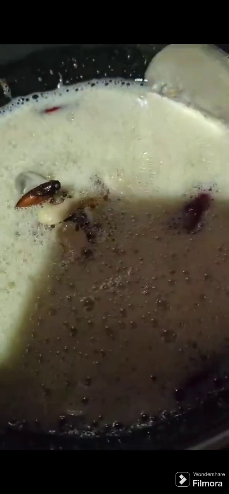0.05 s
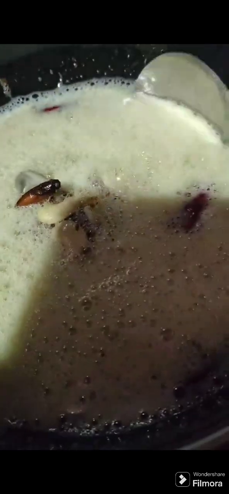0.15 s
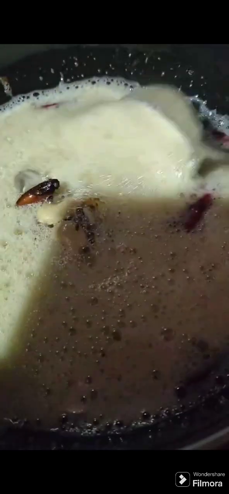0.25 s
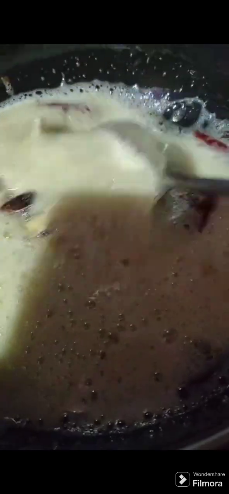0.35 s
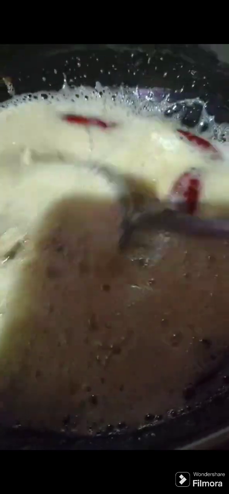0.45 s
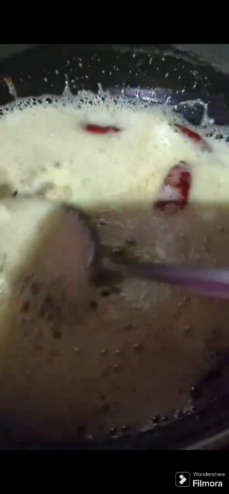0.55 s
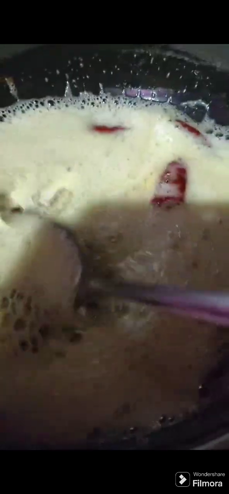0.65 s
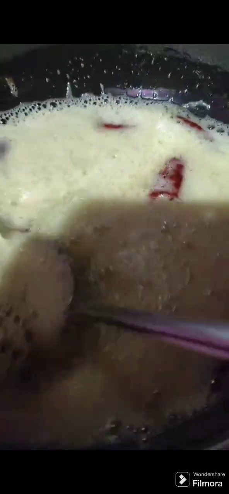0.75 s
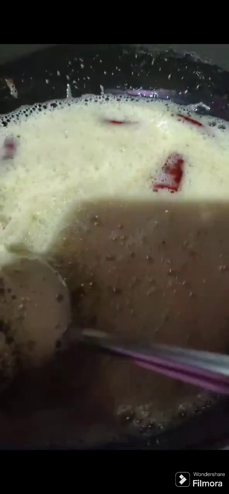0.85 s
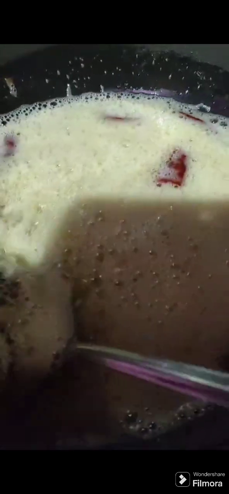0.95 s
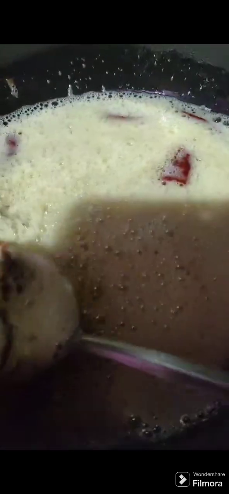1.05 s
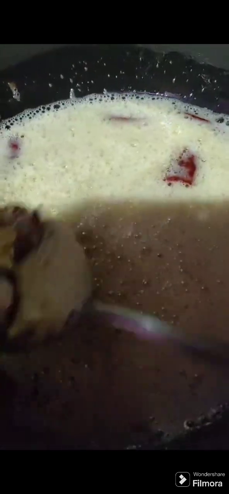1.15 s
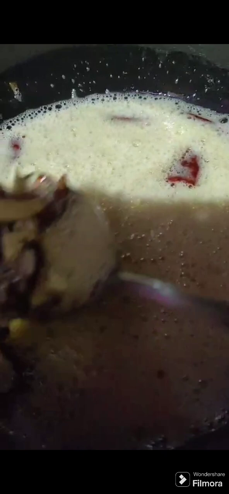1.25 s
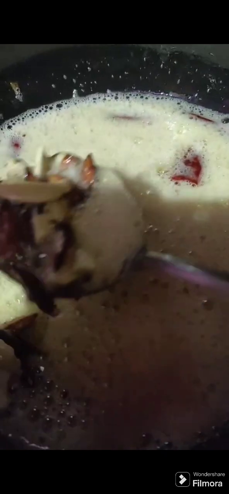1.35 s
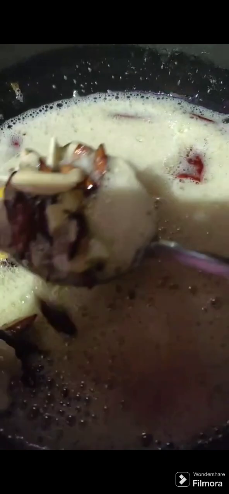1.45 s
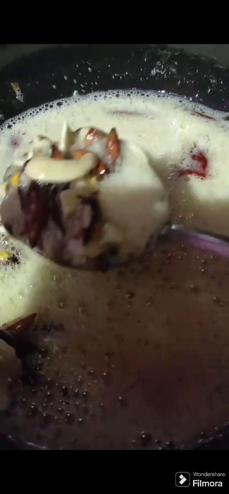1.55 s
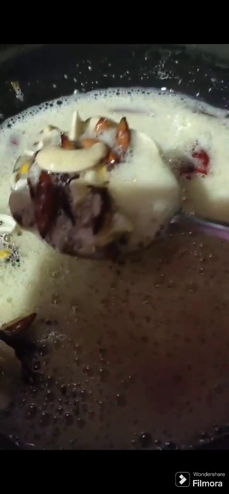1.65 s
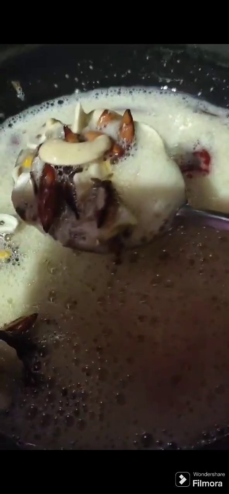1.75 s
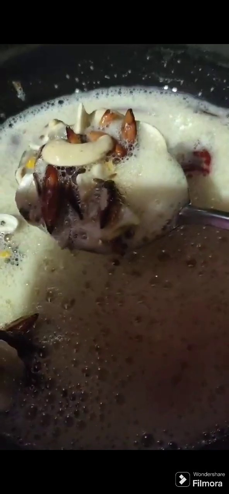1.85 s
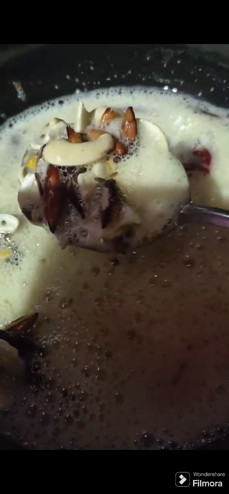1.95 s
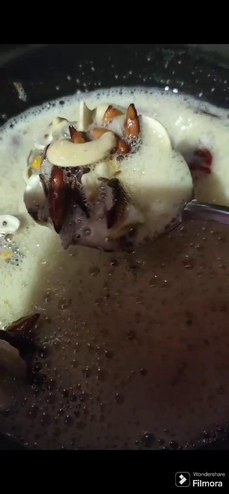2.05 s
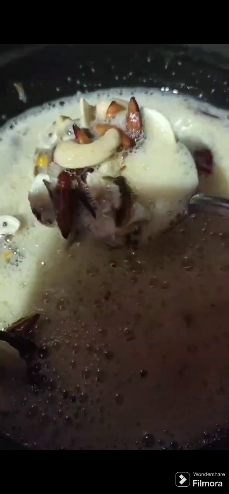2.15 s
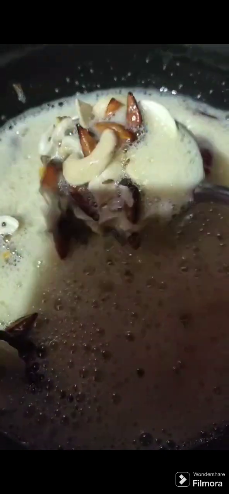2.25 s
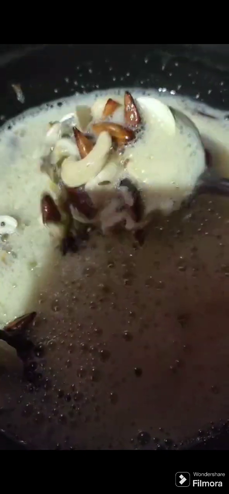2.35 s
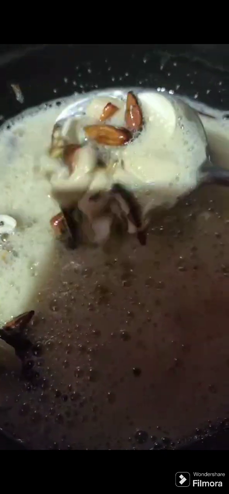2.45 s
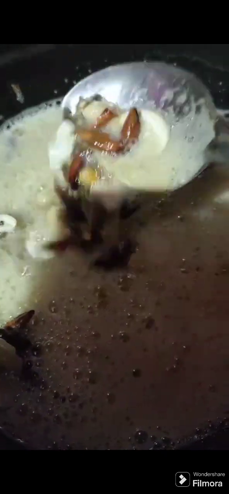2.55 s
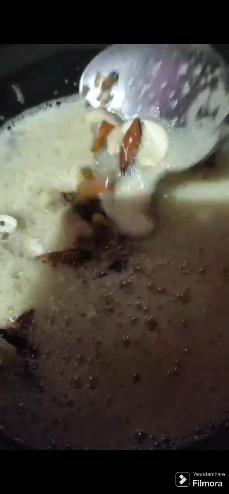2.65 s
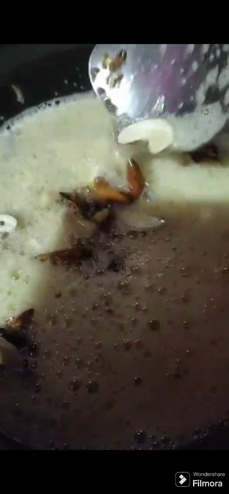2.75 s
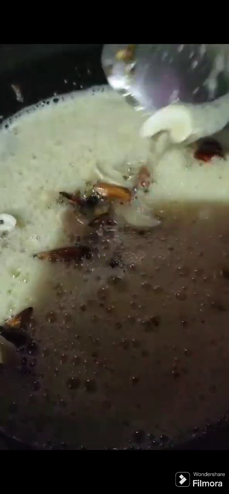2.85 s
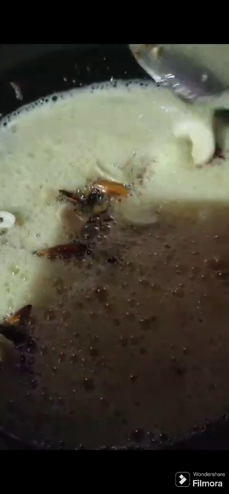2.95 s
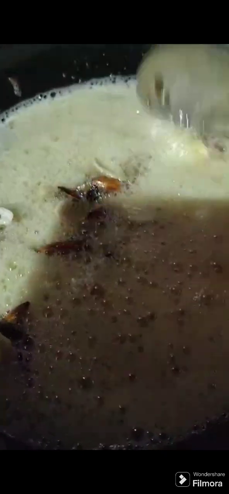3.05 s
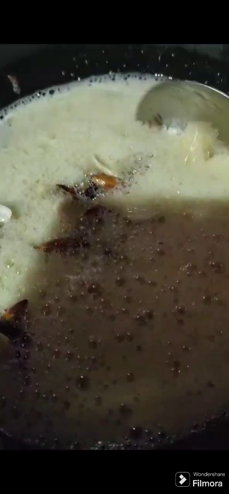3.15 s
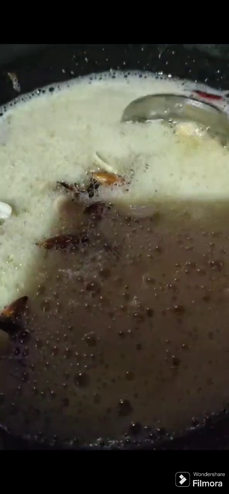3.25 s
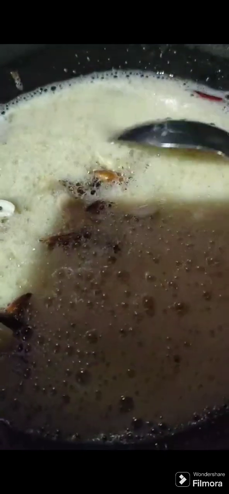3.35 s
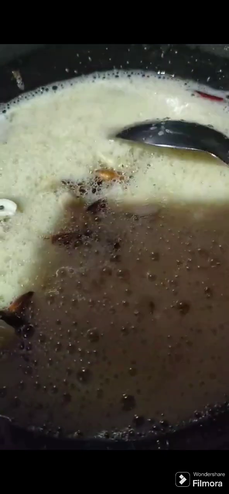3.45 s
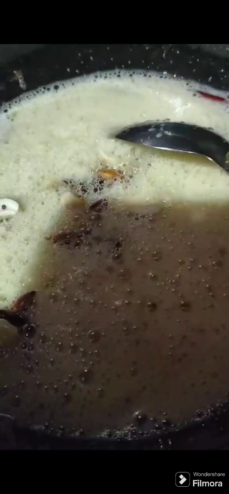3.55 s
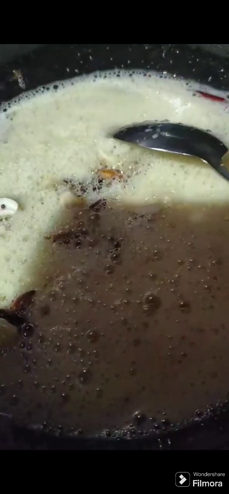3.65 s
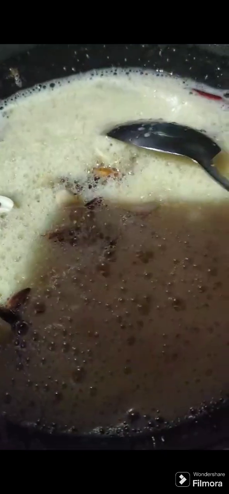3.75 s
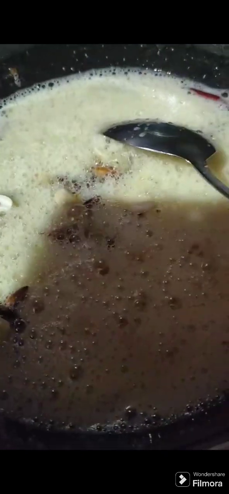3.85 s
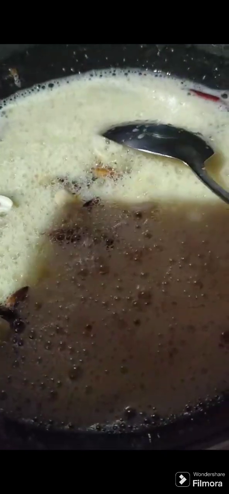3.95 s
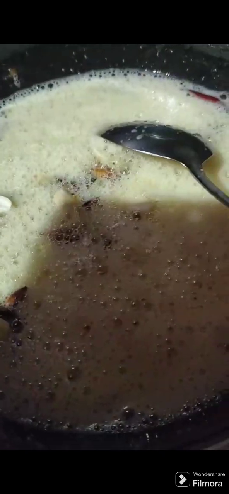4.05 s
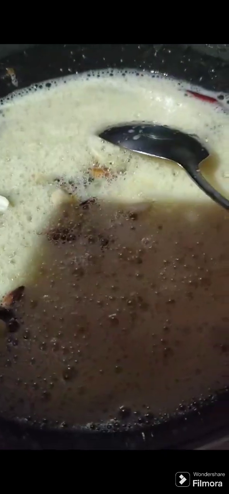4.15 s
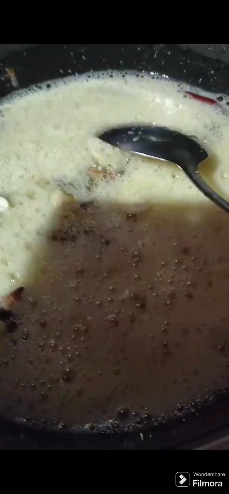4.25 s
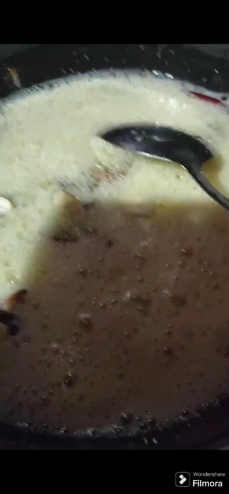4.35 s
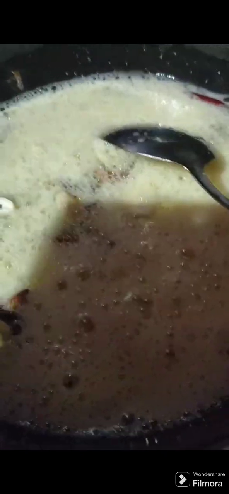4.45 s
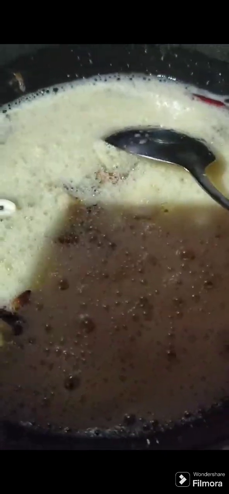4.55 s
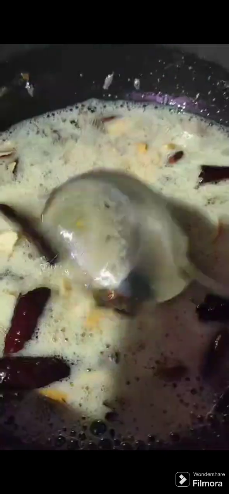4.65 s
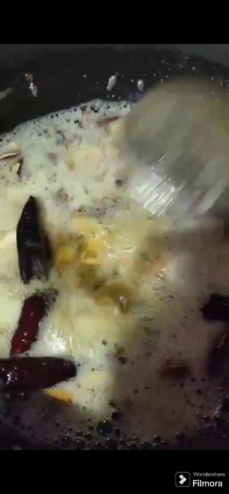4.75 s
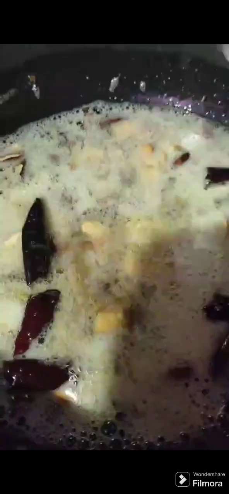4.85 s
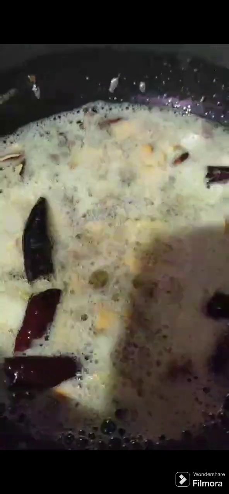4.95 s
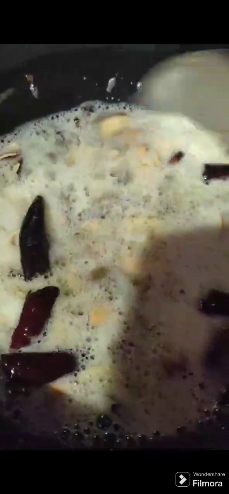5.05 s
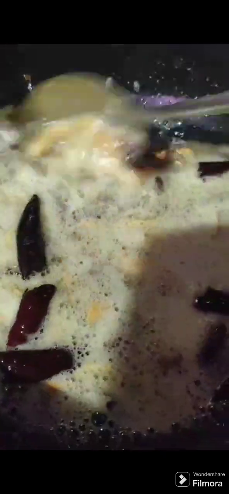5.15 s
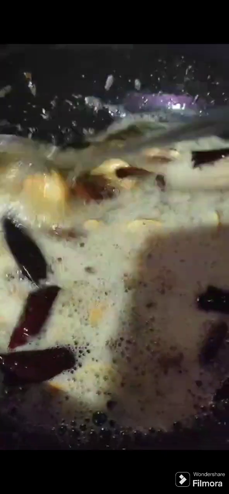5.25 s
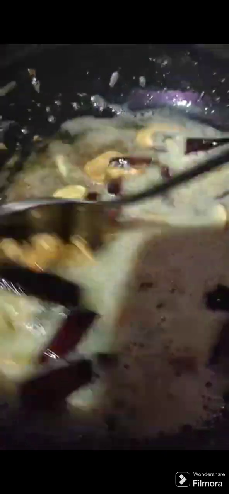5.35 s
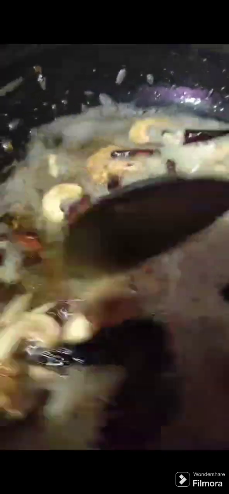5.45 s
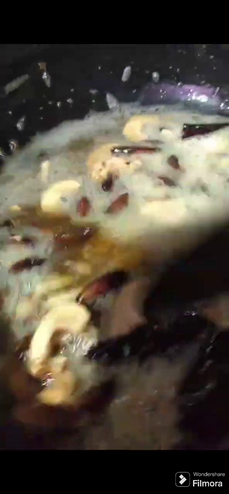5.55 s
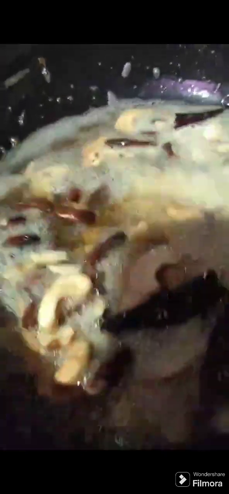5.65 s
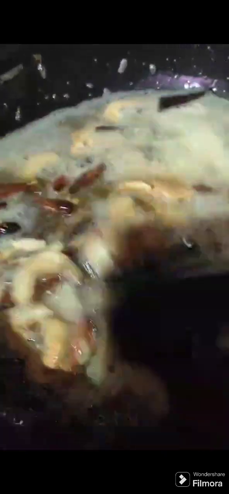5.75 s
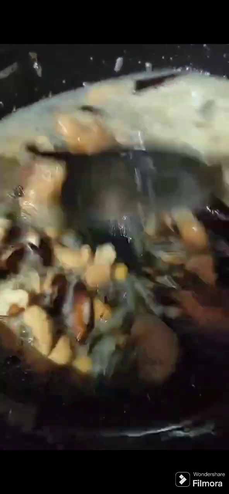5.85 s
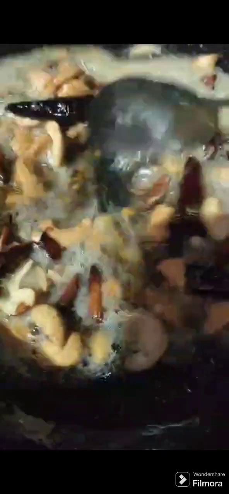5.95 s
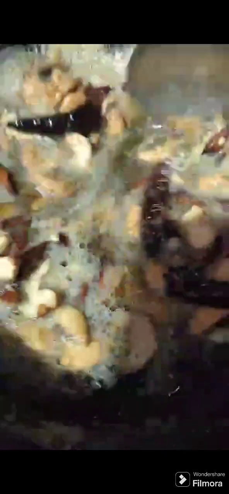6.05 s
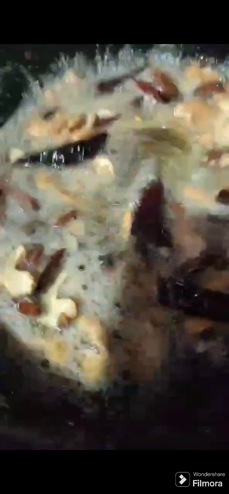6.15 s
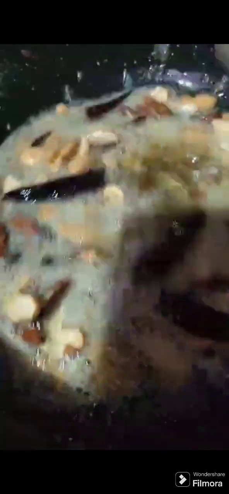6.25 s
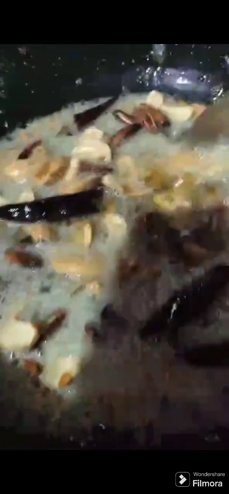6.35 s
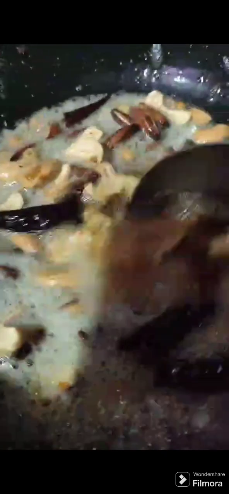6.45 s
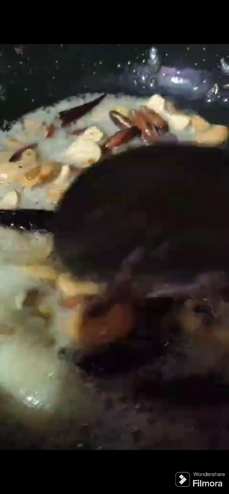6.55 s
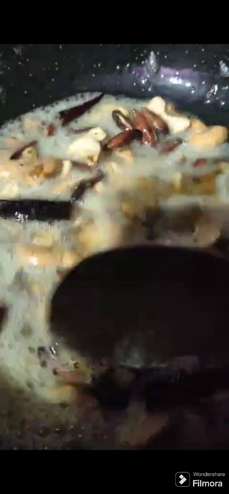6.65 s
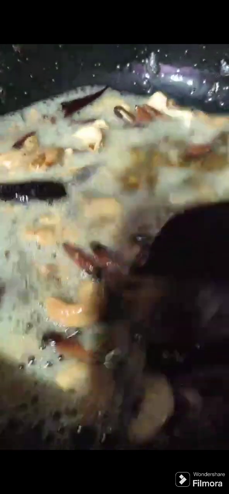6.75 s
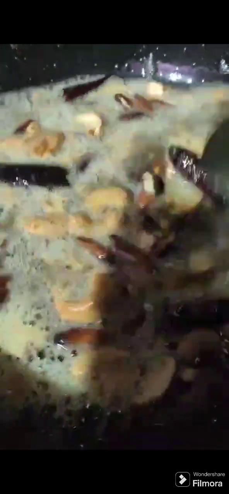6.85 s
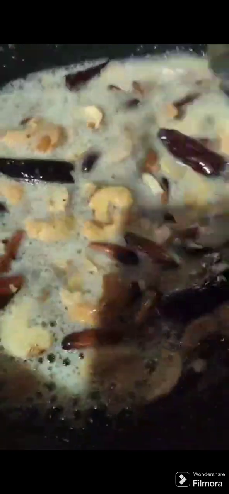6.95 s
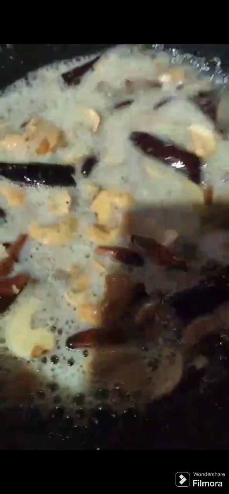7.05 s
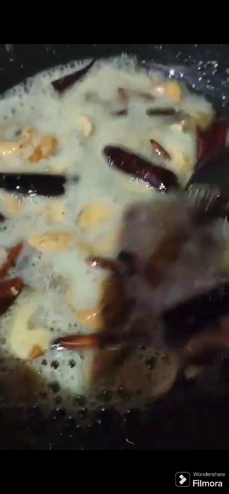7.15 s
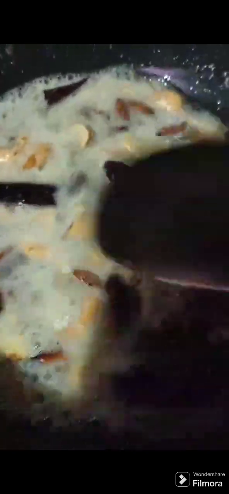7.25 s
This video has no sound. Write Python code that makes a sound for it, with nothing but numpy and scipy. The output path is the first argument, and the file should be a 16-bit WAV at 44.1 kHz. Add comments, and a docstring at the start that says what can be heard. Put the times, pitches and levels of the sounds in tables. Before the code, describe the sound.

A small kitchen heard close to a pan, in stereo, over low room noise and faint wavering traffic drones. At 0.15-0.6 s a steel spoon taps and scrapes roughly with short thin squeals, and the oil flares into bright fizz around 0.4 s. Dull knocks follow at 1.05 and 1.2 s; fizz rises and falls, nearly calming around 2 s, then swelling again near 2.7 s with spits and watery plops. A light clink at 3.4 s and tiny muffled rattles at 3.6-3.7 s lead into quieter bubbling with very faint high tones. At 4.67 s everything cuts out for a few hundredths of a second. Livelier frying then builds, with a distant engine throbbing low. The spoon squeals and scrapes at 5.1-5.45 s, clanks hard and brightly at 5.75-5.95 s, then knocks again at 6.3-6.5, 6.8 and 7.1 s amid sharp sizzling bursts until about 7.3 s.

```python
"""A small kitchen, heard close to the pan: nuts and dried chillies fry in foaming oil.
The oil is dense filtered pops for bubbling, fizz and spatter, with single spits and plops; faint tones join in.
A steel spoon scrapes (rough noise and gliding squeals), clinks (struck resonances) and rattles in the pan.
Outside, wavering sines drone as traffic over low room noise. The sound cuts out briefly at 4.665 s; then
livelier frying builds up and a distant engine idles, as filtered firing pulses and noise."""
import sys
import numpy as np
from scipy import signal
from scipy.fft import rfft, irfft
from scipy.io import wavfile
from scipy.ndimage import uniform_filter1d, map_coordinates

SR = 44100
rng = np.random.default_rng(int(sys.argv[2]) if len(sys.argv) > 2 else 0)


def file_out(sig):
    """Save sig as 16-bit WAV at sys.argv[1]."""
    # one column per channel
    cols = np.atleast_2d(sig).T
    # limit, then scale
    lim = np.clip(cols, -1, 1)
    pcm = np.round(lim * 32767).astype(np.int16)
    wavfile.write(sys.argv[1], SR, pcm)


N = 322638
TIME = np.arange(N) / SR
BREAK_START_S, BREAK_END_S = 4.665, 4.702  # the silence
LEFT_LAG = 12  # samples by which clicks reach the left port late


# The oil flares when it is stirred or the nuts drop back, then settles.
# Columns: peak t/s, rise time/s, fizz level/dB, fall/dB per s
OIL_SURGES = [(0.38, 0.39, -51.5, 27), (0.85, 0.4, -62, 35), (1.25, 0.6, -58, 45), (1.6, 0.88, -63.5, 65),
              (2.05, 0.24, -73.5, 7), (2.42, 0.17, -63, 31), (2.68, 0.47, -55.5, 46),
              (3.25, 0.44, -65.5, 49), (3.6, 0.69, -66.5, 26), (4.08, 0.63, -77.5, 46.5),
              (5.3, 0.28, -45, 72), (5.799, 0.083, -47, 30), (6.45, 0.091, -45, 87), (6.86, 0.29, -54, 99),
              (7.14, 0.032, -62, 6)]
SURGE_RISE_DB, CALM_DB = 28, -91  # depth of each rise; fizz of undisturbed oil
SIMMER_DB = -60  # fizz level at which the oil counts as simmering


def sizzle_db():
    """How hard the oil fizzes, in dB: every surge rises, then settles towards calm."""
    power = amp(CALM_DB) ** 2
    for s, rise_s, db, fall in OIL_SURGES:
        since_peak = TIME - s
        shape_db = np.minimum(SURGE_RISE_DB * since_peak / rise_s, -fall * since_peak)
        power = power + amp(db + np.minimum(shape_db, 0)) ** 2
    return 10 * np.log10(power)


# Tone of the large bubbles, also used for the snap of a plop. Columns: f/Hz, level/dB
BUBBLING_SPECTRUM = [(200, -30), (450, -3.5), (750, -2.5), (1150, -4.5), (1550, -3), (2100, -2),
                     (3000, -3.5), (3900, -13), (5000, -5.5), (8000, -76)]
# Tone of the small bubbles. Columns: f/Hz, level/dB
FIZZ_SPECTRUM = [(2500, -57), (4100, -22), (5000, -3.5), (6100, 3.5), (6800, -2.5), (7500, 4), (8300, -8.5),
                 (9200, -9), (10300, -21.5), (12000, -56), (16000, -48)]
# Tone of the finest bubbles. Columns: f/Hz, level/dB
SPATTER_SPECTRUM = [(1500, -35), (4000, 2.5), (7000, -4.5), (10500, -8.5), (13000, -2.5), (15500, -5)]
# Level at a simmer, dB gained per dB of fizz, and the ceiling of the bubbling
BUBBLING_DB, BUBBLING_FOLLOWS, BUBBLING_MOST_DB = -58, 0.74, -56.5
SPATTER_DB, SPATTER_FOLLOWS = -68, 0.94  # the same two for the spatter
# Steady frying that builds up from the start of the silence
LIVELY_FIZZ_DB, LIVELY_BUBBLING_DB, LIVELY_RISE_S = -56.5, -62, 0.53


def frying():
    """Steam bubbles burst in the foam: large ones blip, small ones fizz, the finest spit."""
    t = TIME[:512]
    blips = 0
    for hz in np.geomspace(600, 2700, num=7):
        blip = np.sin(2 * np.pi * hz * t) * np.exp(-t * hz / 1.5) * hz ** .8
        blips = blips + signal.oaconvolve(pops(per_s=90, spread_db=3.4), blip[None], axes=1)[:, :N]
    large = unit(blips) + pops(per_s=2500, spread_db=2)
    small = pops(per_s=3000, spread_db=3.8)
    finest = pops(per_s=1300, spread_db=3.8)

    fizz_db = sizzle_db()
    over_simmer_db = fizz_db - SIMMER_DB
    lively = np.clip((TIME - BREAK_START_S) / LIVELY_RISE_S, 0, 1)
    bubbling_db = np.minimum(BUBBLING_DB + BUBBLING_FOLLOWS * over_simmer_db, BUBBLING_MOST_DB)
    bubbling_gain = np.hypot(amp(bubbling_db), lively ** 2 * amp(LIVELY_BUBBLING_DB))
    fizz_gain = np.hypot(amp(fizz_db), lively * amp(LIVELY_FIZZ_DB))
    spatter_gain = amp(SPATTER_DB + SPATTER_FOLLOWS * over_simmer_db)

    # bursts, spectrum, gain, how far the ports differ
    layers = [(large, BUBBLING_SPECTRUM, bubbling_gain, 1),
              (small, FIZZ_SPECTRUM, fizz_gain, 1.5),
              (finest, SPATTER_SPECTRUM, spatter_gain, 1.6)]
    out = 0
    for bursts, spectrum, gain, lean in layers:
        smeared = scatter(bursts, db=-4, t60=.06)
        in_room = kitchen(smeared, near_db=-11, far_db=-5, near_t60=.03)
        out = out + unit(ports(colour(in_room, spectrum), lean)) * gain
    return flicker(out, depth_db=2.6, per_s=14, count=56)


# Drops of water that spit in the fat. Columns: t/s, peak level/dB before colouring, f/Hz
WATER_SPITS = [(0.277, -27, 7800), (0.308, -25, 7000), (0.61, -34, 5500), (1.276, -40, 7000),
               (1.576, -36, 6000), (2.481, -32, 8200), (2.72, -34, 7500), (2.743, -39, 10000),
               (4.884, -58, 3300), (5.004, -35.5, 5040), (5.228, -31, 3600), (5.556, -42, 7500),
               (6.132, -33.5, 2600), (6.652, -48, 3000)]
# Tone shared by all spits. Columns: f/Hz, level/dB
SPIT_SPECTRUM = [(1000, -30), (2500, -6.5), (9000, -3.5), (15000, -13)]
SPIT_Q = 2  # sharpness of a spit's resonance
# Lesser spits: rate, range of levels above the fizz, ceiling (before colouring), range of pitches
CRACKLES_PER_S, CRACKLE_OVER_FIZZ_DB, CRACKLE_MOST_DB, CRACKLE_HZ = 40, (2, 14), -43, (5500, 9500)


def spits():
    """Drops of water snap in the hot fat: a few stand out, many small ones crackle with the fizz."""
    out = np.zeros((2, N))
    when, strength, pitch = rng.random((int(CRACKLES_PER_S * N / SR), 3)).T
    over_fizz_db = np.interp(strength ** 3, [0, 1], CRACKLE_OVER_FIZZ_DB)
    level_db = np.minimum(sizzle_db()[(when * N).astype(int)] + over_fizz_db, CRACKLE_MOST_DB)
    crackles = zip(when * N / SR, level_db, np.interp(pitch, [0, 1], CRACKLE_HZ))
    for s, db, hz in [*WATER_SPITS, *crackles]:
        snap = contact(chatter_db=-4, chatter_t60=0.01)[:, :512]
        tick = signal.lfilter(*signal.iirpeak(hz, SPIT_Q, fs=SR), snap)
        add(out, s, amp(db) * tick / abs(tick).max())
    return ports(colour(scatter(out, db=-8, t60=.05), SPIT_SPECTRUM), lean=0.58)


# Large bubbles burst and nuts drop back into the oil.
# Columns: t/s, peak level/dB before the room, f/Hz
LARGE_PLOPS = [(0.571, -38, 1210), (1.368, -41.5, 700), (2.492, -53, 900), (2.613, -40, 865),
               (2.668, -60, 850), (3.102, -46, 880), (3.225, -39.5, 650), (3.276, -47, 900),
               (3.862, -48, 1250), (4.034, -65, 1120), (4.136, -59, 1100), (4.757, -44.5, 790),
               (5.004, -41, 1130), (5.064, -32.5, 550), (6.123, -38, 1250), (6.194, -40.5, 1010),
               (6.22, -40, 1500), (6.646, -36, 1240), (6.681, -39, 1350), (6.731, -40.5, 1197)]
# Lesser bubbles: rate, range of levels at a simmer or hotter, range of pitches
SMALL_PLOPS_PER_S, SMALL_PLOP_DB, SMALL_PLOP_HZ = 8.4, (-54, -55), (684, 1500)


def plops():
    """A film of oil snaps and the cavity under it rings for a few cycles."""
    out = np.zeros((2, N))
    when, strength, pitch = rng.random((int(SMALL_PLOPS_PER_S * N / SR), 3)).T
    over_simmer_db = sizzle_db()[(when * N).astype(int)] - SIMMER_DB
    heat_db = np.minimum(BUBBLING_FOLLOWS * over_simmer_db, 0)
    level_db = heat_db + np.interp(strength, [0, 1], SMALL_PLOP_DB)
    lesser = zip(when * N / SR, level_db, np.interp(pitch, [0, 1], SMALL_PLOP_HZ))
    for s, db, hz in [*LARGE_PLOPS, *lesser]:
        snap = colour(contact(chatter_db=1, chatter_t60=0.013), BUBBLING_SPECTRUM)
        plop = signal.lfilter(*signal.iirpeak(hz, 3, fs=SR), snap) + .05 * snap
        add(out, s, amp(db) * plop / abs(plop).max())
    return ports(kitchen(out, near_db=-10, far_db=-10, near_t60=.04), lean=.9)


# Blows of spoon on pan, each sounded 1.5 ms after its t. Columns: t/s, base level/dB, base f/Hz,
# wall level/dB, wall f/Hz, rim level/dB, rim f/Hz, clink level/dB, bowl f/Hz,
# left minus right/dB before port colour, after-ring level/dB
SPOON_HITS = [(.158,-52.5,540,-53.5,1360,-51.5,2700,-48.5,8300,3.5,-0.5),
              (.167,-55.5,605,-56,1280,-53.5,2510,-54.5,8360,9,0.5),
              (.208,-59.5,597,-54.5,1200,-57,2360,-61,8400,5,0),
              (0.367,-66,824,-71,1400,-61.5,2800,-58,7460,2,4),
              (.438,-65.5,610,-60,1490,-67,2620,-56.5,6470,8,1.5),
              (1.057,-54.5,880,-57,1750,-72,2830,-57.5,5700,5.5,-2.5),
              (1.219,-51,540,-52,1095,-68,2780,-59,6800,4.5,0),
              (3.39,-49,747,-54,1990,-57,2780,-51.5,8100,4,2),
              (5.073,-49.5,740,-54,1570,-72,2600,-60.5,8550,4,-4),
              (5.12,-55,587,-59,1360,-61.5,2600,-52.5,8300,-5.5,2.5),
              (5.374,-55.5,806,-55,1350,-72,2900,-59,5960,2,0),
              (5.397,-56,690,-65,1126,-71,2800,-57,8240,9,-4),
              (5.7448,-39.5,930,-33.5,1640,-39,2850,-26.5,6700,3.5,-2.5),
              (5.779,-53,785,-45,1270,-48,2770,-47,7660,3,-6),
              (5.832,-41.5,700,-34.5,1296,-42.5,2440,-48,6500,2.5,-10.5),
              (5.927,-52,647,-54.5,1370,-60.5,2600,-53.5,6100,1,0.5),
              (6.3245,-40.5,620,-41.5,1160,-43.5,2990,-35,6560,3,-2.5),
              (6.437,-36.5,653,-34.5,1183,-39.5,2530,-39,6960,0.5,-4),
              (6.486,-51.5,540,-52.5,1170,-64,2500,-58,6860,6,-4),
              (6.825,-51,750,-45.5,1730,-63,2130,-56,7140,1,-5),
              (7.1208,-44.5,760,-43.5,1545,-50,2830,-38.5,7060,-0.5,0.5)]
# Dull thud of the pan's base. Columns: f/Hz, level/dB
KNOCK_SPECTRUM = [(40, -43), (170, -3), (350, -5), (600, 1.5), (900, 4), (1300, -4), (2500, -57)]
# Body of the pan's wall. Columns: f/Hz, level/dB
BODY_SPECTRUM = [(500, -16.5), (1000, 13), (1400, 2), (2200, 0), (3000, -8), (3900, -33.5), (5000, -14),
                 (8000, -64)]
# Bright steel of the spoon, also the hiss of a scrape. Columns: f/Hz, level/dB
CLINK_SPECTRUM = [(2000,-55), (4000,-13), (5200,-3.5), (6400,1.5), (8300,-4.5), (10000,-10), (11500,-11),
                  (13000,-15), (15500,-13.5)]
# Half width of each part's resonance, as a share of its pitch
BASE_SPREAD, WALL_SPREAD, RIM_SPREAD = 0.26, 0.17, 0.085
# The pure tone each struck part leaves behind; the bowl's is weaker by a further BOWL_LINGER_DB
LINGER_DB, BOWL_LINGER_DB, LINGER_T60_S = -10.5, -4.5, 0.2
TAIL_UNEVEN_DB = 2.8  # how unevenly the ring of a blow dies away


def clinks():
    """Each blow sounds base, wall and rim at pitches set by where it lands, and the spoon's bowl clinks."""
    direct, tail = np.zeros((2, 2, N))
    t = TIME[:SR // 4]
    for (s, base_db, base_hz, wall_db, wall_hz, rim_db, rim_hz,
         clink_db, bowl_hz, pan_db, after_db) in SPOON_HITS:
        start = s + .0015
        push = contact(chatter_db=-3.0, chatter_t60=0.018)
        base = unit(band(push, base_hz, BASE_SPREAD) + 1.13 * unit(colour(push, KNOCK_SPECTRUM)))
        wall = unit(band(push, wall_hz, WALL_SPREAD) + .5 * unit(colour(push, BODY_SPECTRUM)))
        rim = band(push, rim_hz, RIM_SPREAD)
        bright = colour(contact(chatter_db=4.0, chatter_t60=0.017), CLINK_SPECTRUM)
        bowl = unit(bright + 1.6 * signal.lfilter(*signal.iirpeak(bowl_hz, 12, fs=SR), bright))
        pan_parts = amp(base_db) * base + amp(wall_db) * wall + amp(rim_db) * rim
        side = amp([[pan_db / 2], [-pan_db / 2]])
        blow = side * (pan_parts + amp(clink_db) * bowl)

        parts = [(base_db, base_hz), (wall_db, wall_hz), (rim_db, rim_hz),
                 (clink_db + BOWL_LINGER_DB, bowl_hz)]
        tones = sum(amp(db) * np.sin(2 * np.pi * hz * t) for db, hz in parts)
        lingering = side * tones * amp(LINGER_DB + after_db - 60 * t / LINGER_T60_S)

        struck = np.pad(blow * amp(after_db), [(0, 0), (0, len(t) - blow.shape[1])])
        rung = ring(struck, ring_db=-16.5)
        # the blow itself is taken out, leaving ring and echoes
        echoes = kitchen(rung, near_db=-1.0, far_db=-7.5, near_t60=0.12) - struck
        add(direct, start, blow)
        add(direct, start, lingering)
        add(tail, start, echoes)
    # nuts and oil shift against the metal, so it dies away unevenly
    return ports(direct + flicker(tail, TAIL_UNEVEN_DB, per_s=22, count=72), lean=0.93)


# Spoon dragged over the pan, one curve a stroke, before ring and room. Columns: t/s, grinding level/dB,
# contact resonance level/dB, contact f/Hz, rim level/dB, hiss level/dB
SCRAPE_STROKES = [
    [(.18,-55,-60,1250,-63,-66), (.215,-49,-56,1200,-58,-59), (.26,-61.5,-56,1170,-69,-76),
     (.31,-53,-48,1080,-52,-50.5), (.37,-49.5,-59,1240,-50.5,-54), (.44,-52.5,-48.5,1280,-55,-60),
     (.55,-53.5,-57,1000,-65,-67), (.66,-64,-81,1000,-82,-63)],
    [(5.12,-56,-60,1430,-48,-41), (5.155,-67,-56,1370,-47.5,-42), (5.19,-49,-43.5,1100,-47,-42.5),
     (5.25,-47,-46.5,1050,-55,-43), (5.29,-54,-50.5,1070,-58,-46.5), (5.33,-47,-44.5,1040,-65,-48.5),
     (5.385,-50,-54,990,-53,-50), (5.415,-59,-76,950,-60,-56), (5.47,-60,-73,954,-61,-56)],
    [(5.8,-51,-59,1200,-52,-52), (5.87,-43.5,-46,1000,-59,-48), (5.91,-61,-56,850,-62,-69),
     (5.95,-49,-58,790,-49.5,-42.5), (6.09,-62,-73,791,-75,-66)],
    [(6.412,-64,-63,1150,-66,-63), (6.427,-55,-49,1200,-48,-44), (6.44,-59,-54,1250,-45,-46)],
    [(6.83,-63,-59,1300,-61,-55), (6.855,-46.5,-49,1230,-49.5,-45), (6.91,-70,-74,1150,-65,-64)],
]
# Rough tone of the grinding. Columns: f/Hz, level/dB
GRIND_SPECTRUM = [(150, -18.5), (400, -2), (580, 6.5), (750, 4.5), (1130, 2.5), (1500, -7), (2000, 4),
                  (2900, -14), (3900, -8.5), (6000, -63)]
# Squeals of the spoon's edge, most of them sinking as it slows.
# Columns: t/s, length/s, first f/Hz, last f/Hz, level/dB (sine peak, before ring and room)
EDGE_SQUEALS = [(0.151, 0.084, 2650, 2580, -49), (0.29, 0.057, 1182, 1090, -49.5),
                (0.293, 0.045, 2700, 2840, -53), (0.415, 0.053, 1494, 1427, -53),
                (0.52, 0.055, 1200, 1090, -57), (5.132, 0.041, 2646, 2572, -40.5),
                (5.136, 0.039, 1465, 1320, -48.5), (5.139, 0.035, 3870, 3800, -50),
                (5.232, 0.031, 1030, 970, -42.5)]
SQUEAL_WAVER = 0.025  # rms share of the pitch
# The edge slips in tiny jerks: their rate and spread of strength
SLIPS_PER_S, SLIP_SPREAD_DB = 1000, 3.0
SCRAPE_RIM_HZ, RIM_WIDTH_HZ, CONTACT_WIDTH_HZ = 2500, 810, 500


def scraping():
    """The spoon's edge sticks and slips over the pan, and now and then locks into a squeal."""
    out = np.zeros((2, N))
    for stroke in SCRAPE_STROKES:
        at, *columns = np.transpose(stroke)
        t = np.arange(at[0], at[-1], 1 / SR)
        grind_db, contact_db, contact_hz, rim_db, hiss_db = (np.interp(t, at, column) for column in columns)
        slips = unit(scatter(pops(SLIPS_PER_S, SLIP_SPREAD_DB, len(t)), db=-7, t60=.04))
        # the moving contact favours now one resonance, now another
        uneven = flicker(slips, depth_db=4.4, per_s=34, count=56)
        grinding = amp(grind_db) * unit(colour(uneven, GRIND_SPECTRUM))
        hiss = amp(hiss_db) * unit(colour(uneven, CLINK_SPECTRUM))
        contact_tone = amp(contact_db) * sing(slips, contact_hz, CONTACT_WIDTH_HZ)
        rim_tone = amp(rim_db) * sing(uneven, SCRAPE_RIM_HZ, RIM_WIDTH_HZ)
        add(out, at[0], grinding + hiss + contact_tone + rim_tone)
    for s, length, first_hz, last_hz, db in EDGE_SQUEALS:
        n = round(length * SR)
        waver = unit(uniform_filter1d(rng.standard_normal(n), 90))
        hz = np.linspace(first_hz, last_hz, n) * (1 + SQUEAL_WAVER * waver)
        squeal = np.sin(2 * np.pi * np.cumsum(hz) / SR)
        add(out, s, amp(db) * squeal * signal.windows.tukey(n, .5))
    rung = ring(out, ring_db=-18)
    return ports(kitchen(rung, near_db=-12, far_db=-8, near_t60=0.042), lean=0.6)


# Faint, muffled rattles of the settling spoon. Columns: t/s, length/s, level/dB of the touches
SPOON_RATTLES = [(3.613, 0.055, -64), (3.696, 0.036, -53)]
# Resonances the rattle excites. Columns: f/Hz, width/Hz, level/dB
RATTLE_RESONANCES = [(1063, 70, 7), (1970, 75, -2), (2150, 82, 5.5), (3070, 110, -12), (5890, 150, 1.5),
                     (6800, 370, -9), (8850, 240, -23), (10100, 250, -26)]


def rattling():
    """Quick small touches sound a few damped resonances, heard mostly through the room."""
    touches = np.zeros((2, N))
    for s, length, db in SPOON_RATTLES:
        n = round(length * SR)
        burst = pops(per_s=1500, spread_db=2, n=n) * signal.windows.tukey(n, .6)
        add(touches, s, amp(db) * burst)
    rung = sum(amp(db) * signal.lfilter(*signal.iirpeak(hz, hz / width, fs=SR), touches)
               for hz, width, db in RATTLE_RESONANCES)
    return ports(kitchen(rung, near_db=11.0, far_db=9.5, near_t60=0.029), lean=0.77)


# Faint narrow tones, each lasting until the silence. Columns: start t/s, f/Hz, width/Hz, level/dB
FAINT_TONES = [(3.78,3020,330,-83.5), (4.259,2934,60,-84.5), (4.26,3350,65,-85.5), (4.28,3790,75,-87.5)]


def faint_tones():
    """Faint narrow noise tones between about 2.9 and 3.8 kHz, fading in and lasting until the silence."""
    out = np.zeros((2, N))
    for s, hz, width, db in FAINT_TONES:
        t = TIME[:round((BREAK_END_S - s) * SR)]
        tone = sing(rng.standard_normal((2, len(t))), hz, width)
        add(out, s, amp(db) * tone * np.minimum(t / 0.13, 1))
    return out


# Traffic drones that swell and fade. Columns: t/s, length/s, f/Hz, level/dB (sine peak)
TRAFFIC_DRONES = [(0, 0.37, 64.3, -59), (0.547, 0.56, 87.8, -54.5), (0.85, 0.56, 63.3, -57),
                  (1.197, 0.41, 100.8, -50.5), (1.3, 0.52, 69.56, -48.5), (2.151, 0.78, 83.1, -54),
                  (3.049, 1.15, 64.65, -57)]
DRONE_WAVER, DRONE_WAVER_S = 0.03, 0.117  # largest share of the pitch; time between turns
# Tone of the distant engine. Columns: f/Hz, level/dB
EXHAUST_SPECTRUM = [(25, -51), (45, -46), (62, -5), (84, -0.5), (105, 0.5), (125, -9.5), (148, 0.5),
                    (175, -5), (230, -24.5), (400, -28.5), (900, -64), (4000, -100)]
# The engine slows a little and draws nearer
IDLE_HZ, IDLE_SAG_HZ_PER_S = 22.56, 0.98  # firings a second at the end of the silence; their slowing
ENGINE_DB, ENGINE_GROWTH_DB_PER_S, ENGINE_RISE_S = -55, 2, 0.14


def street():
    """Through the walls: passing vehicles drone and an idling engine throbs with each firing."""
    out = np.zeros((2, N))
    for s, length, hz, db in TRAFFIC_DRONES:
        t = TIME[:round(length * SR)]
        waver = np.interp(t / DRONE_WAVER_S, np.arange(64), rng.uniform(-1, 1, size=64))
        drone = np.sin(2 * np.pi * np.cumsum(hz * (1 + DRONE_WAVER * waver)) / SR)
        add(out, s, amp(db) * drone * signal.windows.tukey(len(t), .9))
    age = np.maximum(TIME - BREAK_END_S, 0)
    turns = np.cumsum(IDLE_HZ - IDLE_SAG_HZ_PER_S * age) / SR
    # one pulse of slightly varying strength each time the count passes a whole number
    firings = np.diff(np.floor(turns), prepend=0) * (1 + 0.12 * rng.standard_normal(N))
    rough = unit(firings) + 0.84 * rng.standard_normal(N)
    exhaust = unit(colour(rough[None], EXHAUST_SPECTRUM, size=8192))
    engine_gain = amp(ENGINE_DB + ENGINE_GROWTH_DB_PER_S * age) * np.minimum(age / ENGINE_RISE_S, 1)
    return out + exhaust * engine_gain


# Tone of the room noise. Columns: f/Hz, level/dB
AIR_SPECTRUM = [(15, -59), (25, -35), (47, -4), (70, 3.5), (188, -5.5), (271, -7.5), (332, -4.5),
                (453, -15), (586, -10.5), (800, -14), (1090, -14.5), (1730, -28), (2000, -29.5),
                (2600, -59), (4400, -120)]
# Loudness of the room noise. Columns: t/s, level/dB
AIR_LEVEL = [(0, -59.5), (0.3, -56.5), (1.4, -55), (1.9, -57.5), (3.5, -57), (4.75, -62), (5.2, -56.5),
             (7.32, -58)]
# Left-right likeness of the room noise. Columns: f/Hz, likeness/0-1
AIR_LIKENESS = [(60, 0.99), (130, 0.91), (290, 0.92), (640, 0.23), (1400, 0.054)]


def air():
    """Low room noise, alike at both ports in the bass."""
    hz = np.fft.rfftfreq(N, 1 / SR)
    left, other = rfft(rng.standard_normal((2, N)))
    same = np.clip(read(AIR_LIKENESS, hz), -1, 1)
    right = same * left + np.sqrt(1 - same ** 2) * other
    noise = irfft(np.array([left, right]) * amp(read(AIR_SPECTRUM, hz)), N)
    return unit(noise) * amp(np.interp(TIME, *np.transpose(AIR_LEVEL)))


# Ringing of pan and spoon. Columns: f/Hz, level/dB, t60/s
METAL_MODES = [(531, -9, .13), (640, -9, .13), (1174, -12, .12), (1514, -10, .13), (1936, -19, .12),
               (2820, -8, .2), (2160, -3, .17), (2617, -5, .17), (4274, -11, .12), (6302, -9, .2),
               (6556, -2, .15), (6778, -6, .22), (7243, -15, .18), (7704, -3, .26), (7935, -10, .18),
               (8363, -11, .2), (10800, -1, .18), (11590, -10, .1), (13750, -9, .08)]


def ring(x, ring_db):
    """Adds the metal's modes, damped by the oil."""
    t = TIME[:SR // 5]
    modes = sum(amp(db - 60 * t / t60) * np.sin(2 * np.pi * (hz * t + rng.random((2, 1))))
                for hz, db, t60 in METAL_MODES)
    response = unit(modes) / np.sqrt(len(t))
    return x + amp(ring_db) * signal.fftconvolve(x, response, axes=1)[:, :x.shape[1]]


# Decay of the room's tail. Columns: f/Hz, t60/s
KITCHEN_DECAY = [(200, 1), (700, 0.37), (2000, 0.47), (6500, 0.38), (10000, 0.3), (16000, 0.16)]


def kitchen(x, near_db, far_db, near_t60):
    """Quick reflections from pan wall and stove, then the room's tail."""
    t = TIME[:SR // 3]
    near = rng.standard_normal((2, len(t))) * amp(-60 * t / near_t60)
    hz, at, z = signal.stft(rng.standard_normal((2, len(t))), SR, nperseg=256)
    decayed = z * amp(-60 * at / read(KITCHEN_DECAY, hz)[:, None])
    far = signal.istft(decayed, SR, nperseg=256)[1][:, :len(t)]
    far *= np.minimum(t / 0.009, 1)
    echo = (amp(near_db) * unit(near) + amp(far_db) * unit(far)) / np.sqrt(len(t))
    return x + signal.fftconvolve(x, echo, axes=1)[:, :x.shape[1]]


# Colour of the two microphone ports. Columns: f/Hz, left minus right/dB at a lean of 1
PORT_DIFFERENCE = [(100, 2), (400, -3), (700, -5.5), (1150, -10), (2200, -2), (3200, 1.5), (5000, 0.5),
                   (6300, 2), (7200, -2.5), (8300, -24), (9300, -15), (10800, -14.5), (15500, 0.5)]


def ports(x, lean):
    """Each microphone port has its own colour; lean scales their difference."""
    heard = []
    for k, side in enumerate((1, -1)):
        heard.append(colour(x[[k]], [(f, side * lean * db / 2) for f, db in PORT_DIFFERENCE]))
    return np.vstack(heard)


def pops(per_s, spread_db, n=N):
    """Random clicks, a few of them large, reaching the right port first."""
    when, size, sign = rng.random((int(per_s * n / SR) + 1, 3)).T
    size = amp(spread_db * np.minimum(-np.log(1 - size), 5)) * np.sign(sign - .5)
    train = np.bincount((when * n).astype(int), size, n)
    return unit(np.array([np.roll(train, LEFT_LAG), train]))


def contact(chatter_db, chatter_t60):
    """One touch: a click and a few milliseconds of chatter."""
    t = TIME[:4096]
    push = amp(chatter_db) * unit(rng.standard_normal((2, len(t))) * amp(-60 * t / chatter_t60))
    push[0, LEFT_LAG] += np.sqrt(len(t))
    push[1, 0] += np.sqrt(len(t))
    return push


def scatter(x, db, t60):
    """Echoes of clicks that each come from a different spot: a short hiss with no fixed colour."""
    keep = amp(-60 / (t60 * SR)) ** 2
    energy = signal.lfilter([1 - keep], [1, -keep], x ** 2)
    return x + amp(db) * np.sqrt(energy) * rng.standard_normal(x.shape)


def flicker(x, depth_db, per_s, count=12):
    """Lets each of several frequency bands swell and fade at random."""
    hz, at, z = signal.stft(x, SR, nperseg=256)
    knots = rng.standard_normal((count + 1, int(at[-1] * per_s) + 2))
    place = np.meshgrid(count * np.sqrt(hz / hz[-1]), at * per_s, indexing="ij")
    z = z * amp(depth_db * map_coordinates(knots, place, order=1))
    return signal.istft(z, SR, nperseg=256)[1][:, :x.shape[1]]


def band(x, hz, spread):
    """A damped resonance with steep sides."""
    edges = hz * np.exp([-spread, spread])
    return unit(signal.sosfilt(signal.butter(2, edges, "bandpass", fs=SR, output="sos"), x))


def resonate(x, hz, width):
    """A resonance that can follow a moving centre: shift down to 0 Hz, smooth, shift back."""
    turn = np.exp(2j * np.pi * np.cumsum(hz * np.ones(x.shape[1])) / SR)
    r = np.exp(-np.pi * width / SR)
    return unit((turn * signal.lfilter([1 - r], [1, -r], x / turn)).real)


def sing(x, hz, width):
    """A steep resonance that can glide."""
    return resonate(resonate(x, hz, width), hz, width)


def colour(x, points, size=4096):
    """Causal (minimum-phase) filter with the given spectrum."""
    log_gain = np.log(amp(read(points, abs(np.fft.fftfreq(size, 1 / SR)))))
    taps = np.fft.ifft(np.exp(np.conj(signal.hilbert(log_gain)))).real[:size // 2]
    return signal.oaconvolve(x, taps[None], axes=1)[:, :x.shape[1]]


def read(points, hz):
    """Reads a spectrum table on a log-frequency axis."""
    f, value = np.transpose(points)
    return np.interp(np.log(hz + 1), np.log(f), value)


def amp(db):
    """Decibels to gain."""
    return 10 ** (np.asarray(db) / 20)


def unit(x):
    """Scales to rms 1."""
    return x / np.sqrt(np.mean(x ** 2) + 1e-20)


def add(mix, s, sound):
    """Mixes a sound in at time s."""
    part = mix[:, max(round(s * SR), 0):][:, :sound.shape[-1]]
    part += sound[..., :part.shape[1]]


def scene():
    """Oil, spoon and surroundings."""
    oil = frying() + spits() + plops()
    spoon = clinks() + scraping() + rattling()
    return oil + spoon + faint_tones() + street() + air()


EDGE_HZ = 15850  # upper band limit


def record(dry):
    """Peaks are rounded off, the sound cuts out for an instant; then the band limit."""
    sounding = (TIME < BREAK_START_S) | (TIME > BREAK_END_S)
    live = uniform_filter1d(1. * sounding, 128)
    rounded = .8 * np.tanh(dry / .8)
    lowpass = signal.firwin(511, EDGE_HZ, window=("kaiser", 9), fs=SR)
    return signal.oaconvolve(rounded * live, lowpass[None], "same")


dry = scene()
out = record(dry)
file_out(out)
```